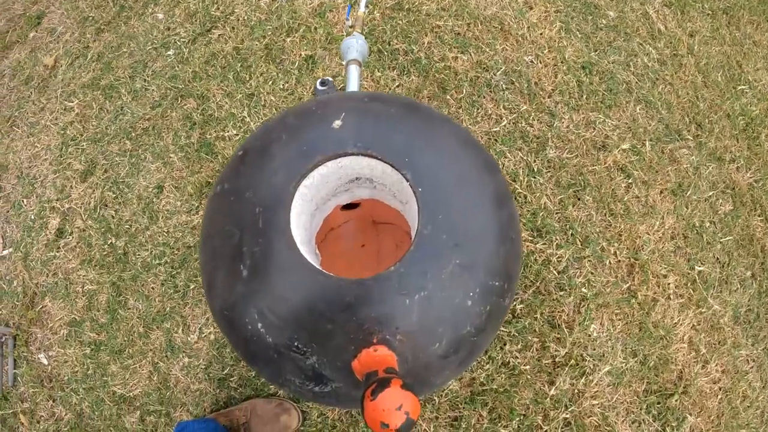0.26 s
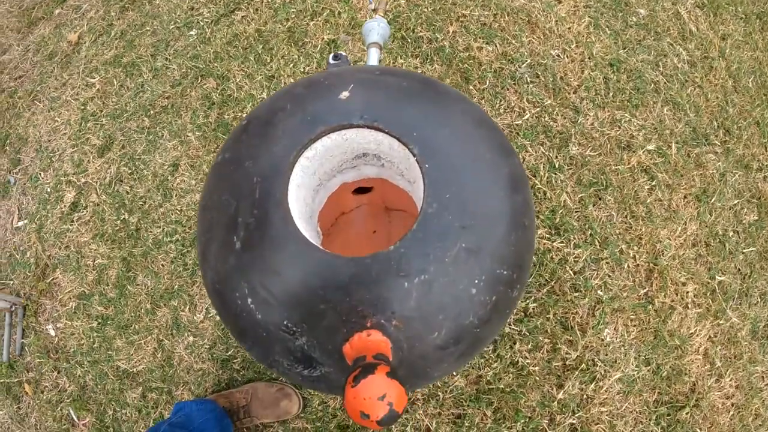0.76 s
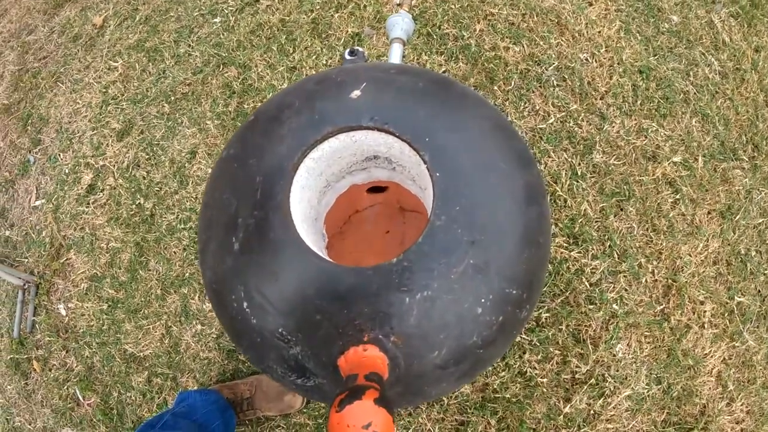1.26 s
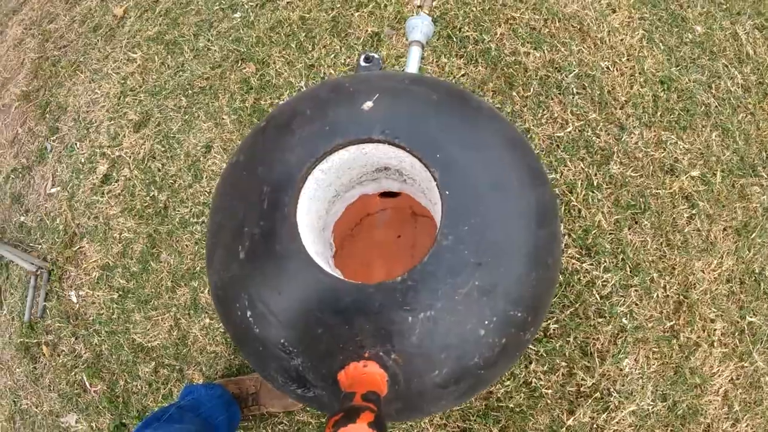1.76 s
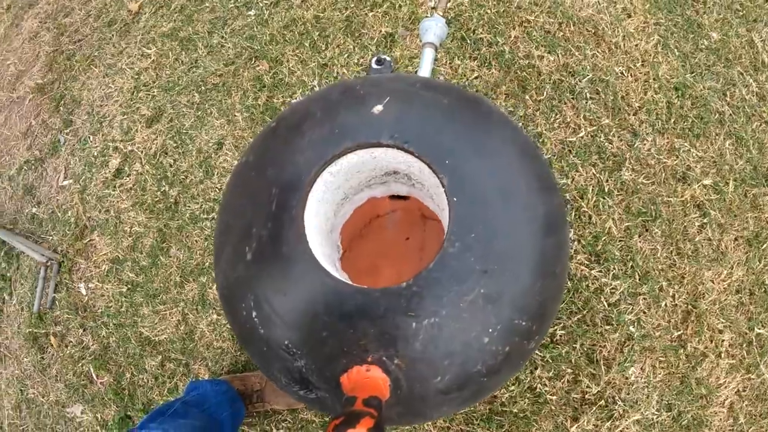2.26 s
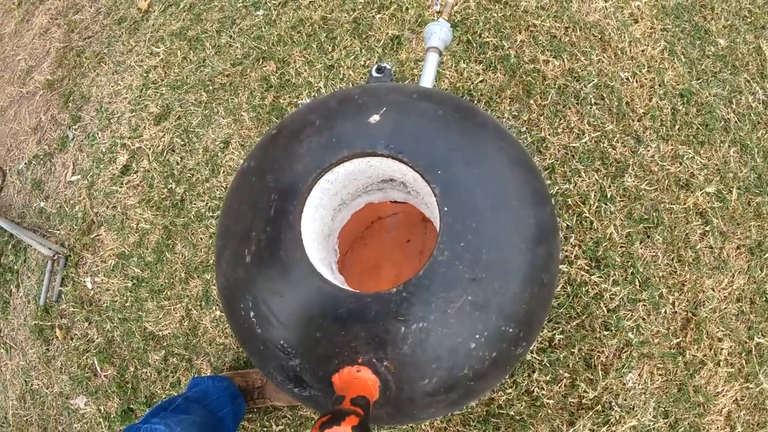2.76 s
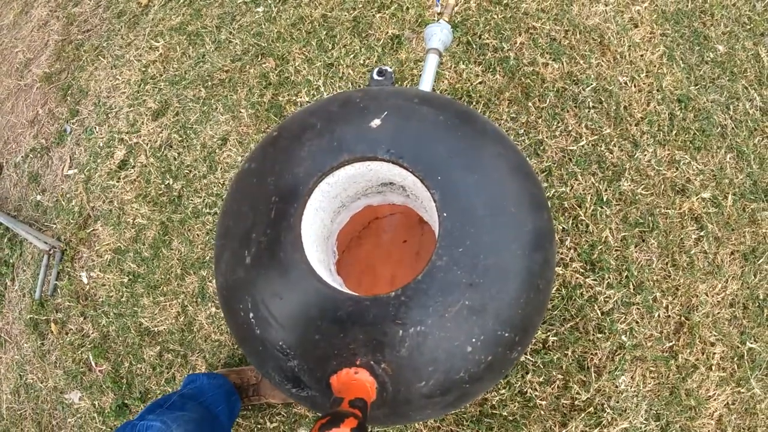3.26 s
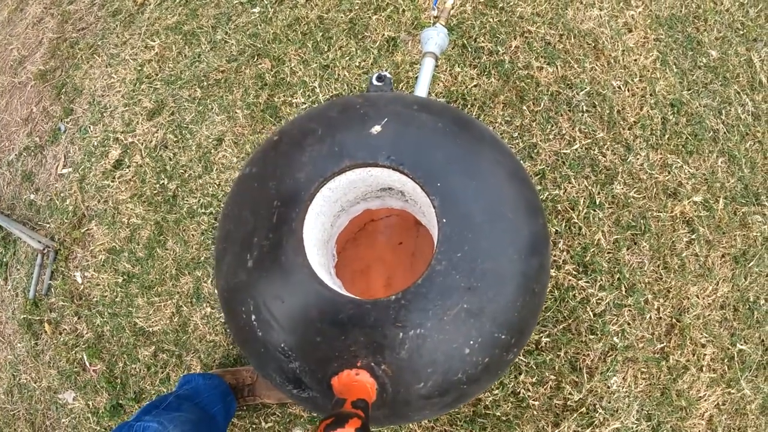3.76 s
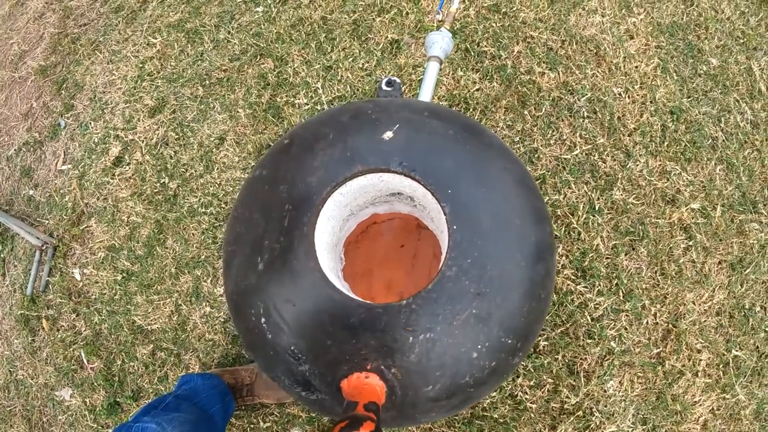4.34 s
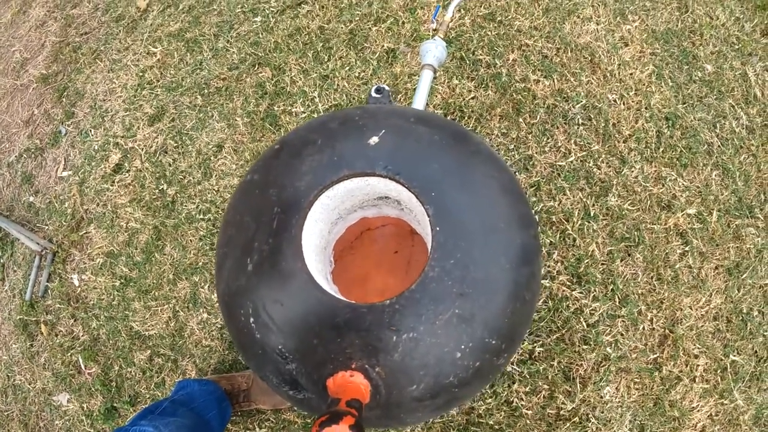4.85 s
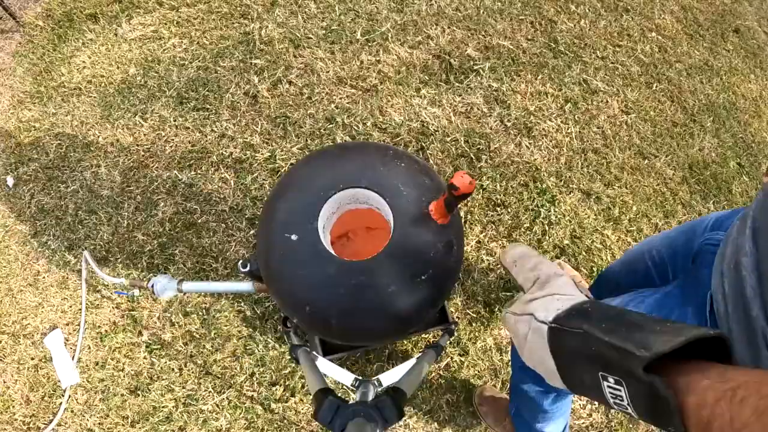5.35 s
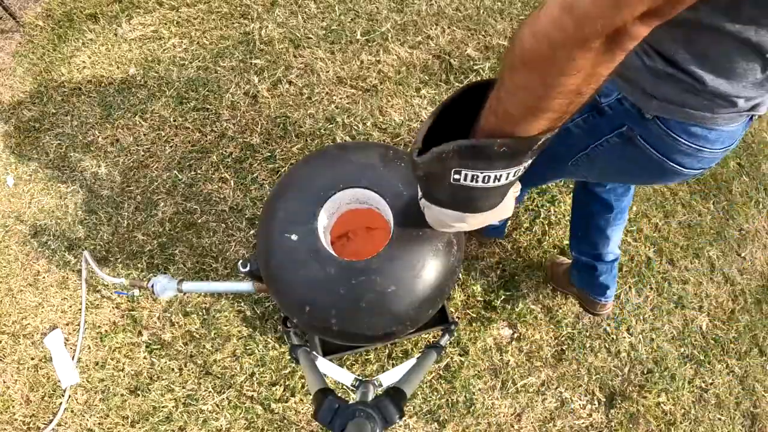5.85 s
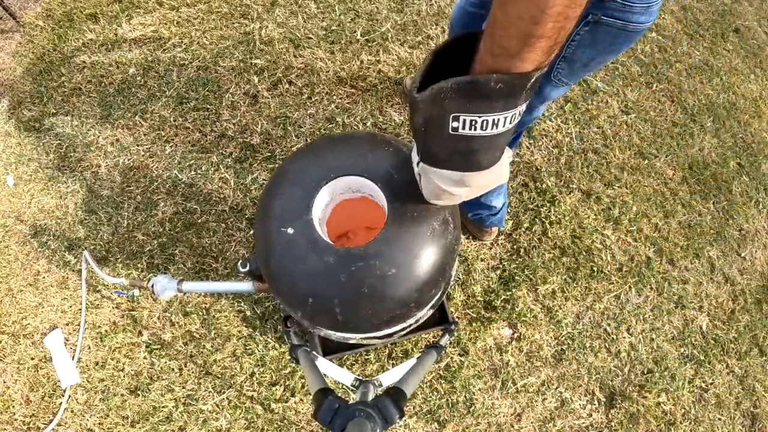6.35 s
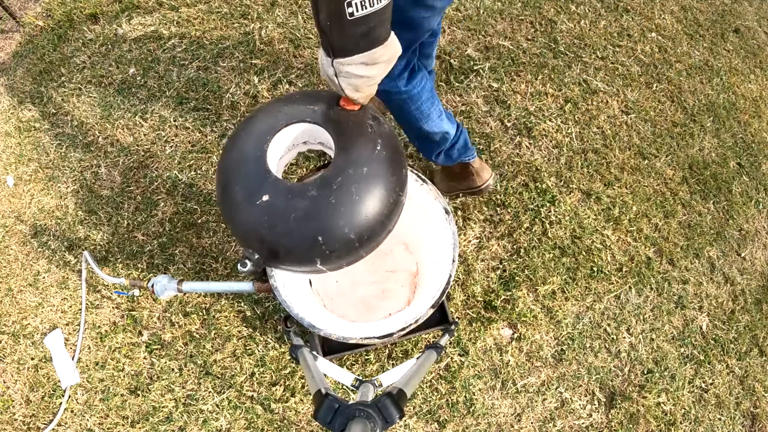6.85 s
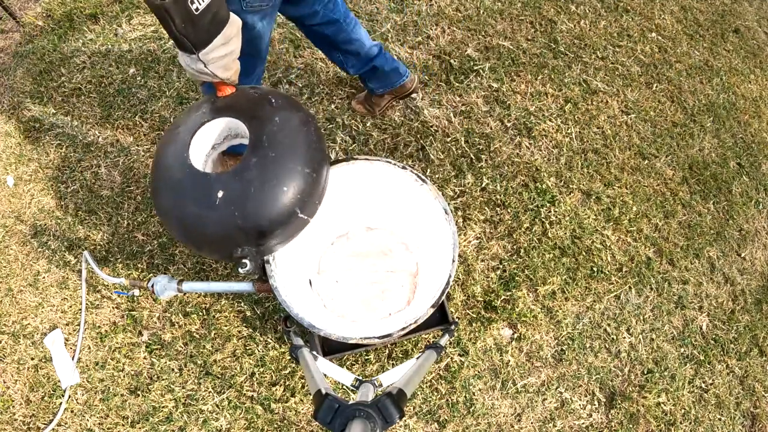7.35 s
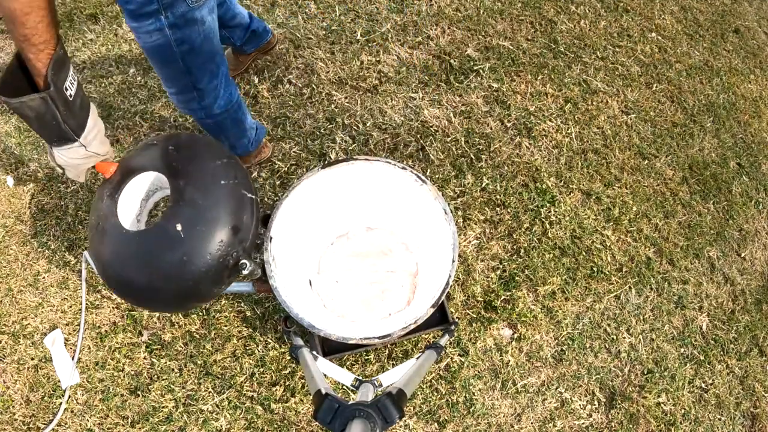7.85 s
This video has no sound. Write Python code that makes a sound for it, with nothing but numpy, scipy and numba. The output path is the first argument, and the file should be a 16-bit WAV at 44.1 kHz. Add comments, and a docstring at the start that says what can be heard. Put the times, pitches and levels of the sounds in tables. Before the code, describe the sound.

Deep, bottle-like flame boom and soft gas hiss, close and dry; near the end a steel lid knocks aside, raising the boom's pitch.

```python
"""A gas burner fires into a small foundry furnace on a lawn, heard from above the vent, then from a step aside.
The turbulent flame is filtered noise: it booms in the chamber, which sounds like a bottle, and roars above that.
The gas jet hisses through its tube, a thin whistle flutters at the supply, and air thumps on the microphone.
Late on the lid is lifted and swung aside with one steel knock, a few decaying modes:
the boom rises in pitch and the roar comes out brighter."""
import sys
import numpy as np
from scipy import signal
from scipy.fft import rfft, irfft, next_fast_len
from scipy.io import wavfile
from scipy.ndimage import uniform_filter1d, minimum_filter1d
from numba import njit

SR = 44100
rng = np.random.default_rng(int(sys.argv[2]) if len(sys.argv) > 2 else 0)


def digitize_waveform(pressure):
    """Quantize a signal to 16-bit integers and store it at the path in sys.argv[1].

    Rows of a 2-D input are taken as channels; values are limited to [-1, 1].
    """
    field = np.atleast_2d(pressure).T
    bounded = np.clip(field, -1, 1)
    quanta = np.round(bounded * 32767).astype(np.int16)
    wavfile.write(sys.argv[1], SR, quanta)


N = 356548
TIME = np.arange(N) / SR

# The thin whistle of the gas supply. Each row: time in seconds, pitch before its bend in Hz, level in dB.
WHISTLE_PATH = [(0, 9880, -81.5), (2.4, 10200, -74.5), (4.3, 10150, -73), (4.43, 10050, -70),
                (4.47, 10100, -80), (4.72, 10160, -73.5), (5.25, 10200, -72), (5.28, 9680, -74.5),
                (7.4, 9600, -80.5), (8.05, 9520, -78)]
# The lid is cracked open, lifted and swung aside. Each row: time in seconds, share of its travel (0-1).
LID_PATH = [(6.18, 0), (6.27, .07), (6.33, .04), (6.39, .16), (6.56, .14), (6.68, .38), (6.86, 0.62),
            (7.02, .76), (7.5, 1)]
# The lid's edge uncovers the gas jet in two steps. Each row: time in seconds, share uncovered (0-1).
JET_UNCOVERED = [(6.64, 0), (6.67, .4), (6.8, .4), (6.83, .88), (7.0, .97), (7.4, 1)]
# How far the furnace is off the microphone's axis. Each row: time in seconds, share (0-1).
FURNACE_OFF_AXIS = [(0, .14), (1.5, 0.67), (5.25, 0.99), (5.28, 0), (7.3, 0.05), (8.05, 0.46)]

# Spectra of the boom's burning, lid shut and lid away. Each row: frequency in Hz, relative density in dB per Hz.
BURN_LID_SHUT = [(15, -14), (40, -3), (70, 3), (130, 1.5), (200, -2.5), (255, -5.5), (300, -10.5),
                 (345, -16), (450, -37.5), (900, -58)]
BURN_LID_AWAY = [(15, -16.5), (70, 4), (130, 1), (200, -1), (270, -2.5), (330, -10), (385, -24.5),
                 (460, -38.5), (900, -59.5)]
# Spectra of the roar from above the vent, from a step aside and with the lid away.
# Each row: frequency in Hz, relative density in dB per Hz.
ROAR_FROM_ABOVE = [(250, -19), (350, -5), (430, 2), (520, -1), (650, -4.5), (800, -7), (930, -4.5),
                   (1170, -8), (1400, -16.5), (1650, -21), (1900, -27), (2400, -35), (3200, -48.5),
                   (6000, -73)]
ROAR_FROM_ASIDE = [(250, -23), (350, -1.5), (420, 0), (510, -0.5), (620, -11), (780, -10), (950, -9),
                   (1160, -9), (1380, -23), (1800, -24.5), (2300, -34), (3200, -42.5), (6000, -70.5)]
ROAR_LID_AWAY = [(280, -22), (385, -3.5), (440, 2), (540, 0), (700, -4), (920, -10.5), (1180, -10),
                 (1450, -16), (1850, -29.5), (2400, -31.5), (3200, -42), (6000, -70)]
# Spectra of the jet's hiss from above the vent, from a step aside and with the lid away.
# Each row: frequency in Hz, relative density in dB per Hz.
HISS_FROM_ABOVE = [(1200, -9.5), (2000, 1), (2400, 1), (2650, -.5), (2850, 0), (3020, -4), (3300, -1.5),
                   (3950, 1), (4450, 1.5), (5020, -3.5), (5450, -.5), (6100, -7.5), (6500, -9), (7700, -14),
                   (10000, -35)]
HISS_FROM_ASIDE = [(1200, -11), (2000, 0), (2700, -1.5), (3000, -1), (3400, 0.5), (4000, -2), (4700, -3),
                   (5600, -7), (7500, -21), (10000, -32)]
HISS_LID_AWAY = [(1500, -8), (2400, -7), (2750, -1.5), (3100, 2), (3500, .8), (4050, -3.5), (4700, -7),
                 (5400, -10), (5900, -14), (6300, -19.5), (7500, -23.5), (10000, -43.5)]
# Spectrum of the fine sizzle. Each row: frequency in Hz, relative density in dB per Hz.
SIZZLE_SPECTRUM = [(4500, -19), (6300, -1.5), (7800, -1), (8600, -5.5), (9600, 1), (10800, -17),
                   (12000, -16), (13800, -15.5), (15000, -27)]
# Spectrum of air on the microphone. Each row: frequency in Hz, relative density in dB per Hz.
BUFFET_SPECTRUM = [(8, -10), (20, -3.5), (45, -2), (80, -12), (200, -41.5), (600, -96)]

# Narrow overtones of the chamber, each filtered twice.
# Each row: Hz with the lid shut, Hz with the lid away, width of each pass in Hz, relative gain in dB.
CHAMBER_OVERTONES = [(906, 1300, 110, -1.5), (1110, 1500, 100, 7), (1570, 970, 90, -12),
                     (2023, 2800, 66, -9), (2424, 2340, 130, -13)]
# Resonances of the burner tube, filtered twice. Each row: Hz, width of each pass in Hz, relative gain in dB.
BURNER_TUBE_MODES = [(2830, 200, -4), (3150, 330, 0), (3480, 400, 1.5), (4400, 900, -6), (5400, 800, -11)]
# The lid knocks on its pivot. Each row: start in seconds, strength in dB.
LID_KNOCKS = [(6.9658, -16.3)]
# Modes of the lined steel lid. Each row: frequency in Hz, strength relative to the blow in dB, t60 in seconds.
LID_SHELL_MODES = [(620, 1.5, .02), (790, 2, .026), (1400, -2, .02), (1540, -14, .05), (1760, -13, .014),
                   (2015, -31, .15), (2046, -23, .32), (2090, -30, .18), (2930, -37, .3)]

# The flame surges or sags. Each row: middle in seconds, length in seconds, change in dB.
FLAME_SURGES = [(.36, .2, -1.6), (1.2, .14, -2), (1.58, .2, 2), (1.98, .24, 2), (4.2, .5, 1.8),
                (4.72, .2, -1), (5.15, .22, 2.5), (5.48, .22, -3.5), (5.59, .14, 2), (6.14, .2, -1.5),
                (6.31, .2, 1.5), (6.66, .13, 3.2), (6.87, .16, -4), (7.15, .3, 2.5), (7.38, .25, -1.4),
                (7.7, .16, -1.5), (7.91, .2, 1.5)]
# The top of the roar brightens or dulls. Each row: middle in seconds, length in seconds, change in dB.
ROAR_TOP_CHANGES = [(3.03, .7, 3), (4.53, .42, -7), (5.75, .3, 2), (6.4, .6, -3)]
# The hiss sinks for a while. One row: start in seconds, end in seconds, change in dB.
HISS_LULL = (3.41, 5.255, -6)
# The hiss spurts or dips. Each row: start in seconds, end in seconds, change in dB.
HISS_SPURTS = [(-.1, .22, -1.5), (.5, .6, 1.2), (1.2, 1.46, .6), (1.53, 1.64, 2.2), (1.73, 1.92, 1),
               (1.97, 2.05, -0.8), (2.28, 2.34, -3), (2.76, 3.0, 2.8), (3.1, 3.22, 3), (3.29, 3.35, 1),
               (3.59, 3.672, 7.5), (3.67, 3.86, 3), (3.86, 4.035, 2.2), (4.04, 4.16, 6.8), (4.16, 4.3, 4.5),
               (4.44, 4.56, -2), (4.69, 4.8, 5.3), (4.8, 4.99, 3), (5.08, 5.156, 6), (5.15, 5.24, 2.5),
               (5.7, 5.82, 2.3), (6.83, 6.9, 3.5), (6.91, 6.98, -2), (7.01, 7.05, 2.8), (7.19, 7.26, 1.5),
               (7.34, 7.56, 2.5), (7.6, 7.658, 3), (7.78, 7.886, 6), (7.88, 8.0, 2.5)]
# Spits of extra sizzle. Each row: middle in seconds, length in seconds, change in dB.
SIZZLE_SPITS = [(2.93, .16, 3), (3.63, .13, 5), (4.1, .2, 4.5), (5.12, .1, 2.5)]
# Gusts on the microphone. Each row: middle in seconds, length in seconds, change in dB.
MICROPHONE_GUSTS = [(2.35, .5, 5), (6.33, 0.3, 13), (6.92, .4, 9), (7.8, .36, 19), (8.05, 0.24, 17)]

# one edit: the sound cuts from above the vent to a step aside, with a faint, dry click
CUT_S, CLICK_DB, CLICK_DECAY_S = 5.2614, -33, .00005
# the listener leans in over the vent: level at first, time constant;
# the highest sounds beam upward, so the sizzle gains this many times as many dB
LEAN_DB, LEAN_S, SIZZLE_BEAMING = -1.1, 1, 3.6

# shares of the lid's travel: the rim shields roar and hiss up to the first;
# beyond it a gap of this scale lets the boom, or the roar and hiss, out
RIM_SHARE, BOOM_GAP, ROAR_GAP = .14, 0.058, 0.3
OPEN_SHARE = 0.78  # weight of the open chamber's sound, once the gap is wide

# the chamber's bottle resonance, lid shut and lid away
SHUT_HZ, OPEN_HZ, CHAMBER_WIDTH_HZ = 164.1, 252, 50.8
# each layer: base level above the vent, change a step aside, change with the lid away (dB)
BOOM_DB, BOOM_ASIDE_DB, BOOM_OPEN_DB = -15.65, -2.03, 1.3
ROAR_DB, ROAR_ASIDE_DB, ROAR_OPEN_DB = -39.5, -0.43, 10.5
HISS_DB, HISS_ASIDE_DB, HISS_OPEN_DB = -60, 0.1, 10.5
# the lid leaves the level of the fine sizzle alone
SIZZLE_DB, SIZZLE_ASIDE_DB = -72.5, 2.2
SIZZLE_FOLLOWS = .75  # dB that the sizzle gains per dB of a spurt in the hiss

ROAR_TOP_HZ = 1330  # the top of the roar begins here
SPURT_EDGE_S = .05  # time that the hiss takes to rise or fall
# once the lid is clear of the rim, the bare flame rasps
CLEAR_S, RASP_HZ, RASP_WIDTH_HZ, RASP_DB = 7.76, 1850, 700, -52.5
FLUTTER_HZ = 62.3
# a higher, fainter whistle (dB relative to the first) builds up beside it, then fades out from 6.64 to 7.4 s
UPPER_WHISTLE_HZ, UPPER_WHISTLE_DB, UPPER_RISE_S = 10360, -5, 4.3
# air on the microphone: base level and spread of its slow wander (dB)
BUFFET_DB, BUFFET_WANDER_DB = -47, 2.5
TOP_HZ = 14800  # upper limit of the microphone's sound


def undb(db):
    """Decibels to gain."""
    return 10 ** (np.asarray(db) / 20)


def unit(x):
    """Scale to an rms of one."""
    return x / np.sqrt(np.mean(x ** 2))


def curves(table):
    """The columns of a table, joined by straight lines in time."""
    seconds, *columns = np.transpose(table)
    return [np.interp(TIME, seconds, column) for column in columns]


def swells(table):
    """Smooth rises and falls in dB, one for each row of middle, length, change."""
    total = 0
    for middle, length, db in table:
        phase = np.clip((TIME - middle) / length, -.5, .5)
        total = total + db * np.cos(np.pi * phase) ** 2
    return total


def edge(start):
    """A quick rise from zero to one around a moment."""
    return np.clip((TIME - start) / SPURT_EDGE_S + .5, 0, 1)


def spurts(table):
    """Quick, held steps in dB, one for each row of start, end, change."""
    return sum(db * (edge(start) - edge(end)) for start, end, db in table)


def turbulence():
    """White noise."""
    return rng.standard_normal(N)


def walk(rate):
    """Random levels, `rate` of them per second, slewed twice; spread one."""
    hold = int(SR / rate)
    steps = np.repeat(rng.standard_normal(N // hold + 1), hold)
    slewed = uniform_filter1d(uniform_filter1d(steps, hold), hold)
    return unit(slewed[:N])


def colour(x, spectrum):
    """Filter a sound by a curve of (Hz, dB) points, to an rms of one."""
    hz, db = np.transpose(spectrum)
    size = next_fast_len(N)
    bins = np.maximum(np.arange(size // 2 + 1) * SR / size, 1)
    gain = undb(np.interp(np.log(bins), np.log(hz), db))
    return unit(irfft(rfft(x, size) * gain, size)[:N])


@njit
def band_pass(x, hz, width):
    """State-variable band-pass whose centre may move, gain one at the centre."""
    y, band, low = np.empty(len(x)), 0., 0.
    for i in range(len(x)):
        g = np.tan(np.pi * hz[i] / SR)
        k = width / hz[i]
        v = (band + g * (x[i] - low)) / (1 + g * (g + k))
        band, low, y[i] = 2 * v - band, low + 2 * g * v, k * v
    return y


def resonate(x, hz, width_hz):
    """One resonance, fixed or moving."""
    return band_pass(x, hz * np.ones(N), float(width_hz))


def steep(x, hz, width_hz):
    """A resonance applied twice, with dark skirts."""
    return resonate(resonate(x, hz, width_hz), hz, width_hz)


def aside():
    """Zero above the vent, one a step aside, with a 4 ms crossfade at the cut."""
    return np.clip((TIME - CUT_S) / .004 + .5, 0, 1)


def lean_db():
    """The sound grows a little as the listener leans in."""
    return LEAN_DB * np.exp(-TIME / LEAN_S)


def travel():
    """How far the lid has moved, 0-1."""
    return curves(LID_PATH)[0]


def laid_open(gap, shielded):
    """Share of the sound that escapes past the lid; the first gap beyond the shielding rim does most."""
    return OPEN_SHARE * np.tanh(np.maximum(travel() - shielded, 0) / gap)


def uncover(x, above_vent, past_rim, lid_away, gap, shielded=0):
    """A sound heard down the vent, past its rim, and at last mostly straight from the open chamber."""
    step, opening = aside(), laid_open(gap, shielded)
    shut = (1 - step) * colour(x, above_vent) + step * colour(x, past_rim)
    return (1 - opening) * shut + opening * colour(x, lid_away)


def boom(neck_power=.3, drift=.012):
    """Unsteady burning drives the air in the vent against the chamber; a wider opening raises the note."""
    neck = travel() ** neck_power
    hz = (SHUT_HZ + (OPEN_HZ - SHUT_HZ) * neck) * (1 + drift * walk(rate=3.3))
    db = BOOM_DB + BOOM_ASIDE_DB * aside() + BOOM_OPEN_DB * neck
    db = db + lean_db() + swells(FLAME_SURGES)
    burning = uncover(turbulence(), BURN_LID_SHUT, BURN_LID_SHUT, BURN_LID_AWAY, BOOM_GAP)
    ringing = resonate(burning, hz, CHAMBER_WIDTH_HZ)
    # the gas feed is steady, so the power evens out over a ninth of a second
    power = uniform_filter1d(ringing ** 2, size=SR // 9)
    return ringing / np.sqrt(power) * undb(db)


def roar(flicker_db=0.55, wander_db=0.3, surge_share=0.25, jet_share=0.097, overtone_db=-15.0):
    """Smaller eddies flicker and ring the chamber's higher modes, which slide and fade as the lid leaves."""
    db = ROAR_DB + ROAR_ASIDE_DB * aside() + ROAR_OPEN_DB * travel() + lean_db()
    db = db + surge_share * swells(FLAME_SURGES) + jet_share * spurts(HISS_SPURTS)
    db = db + wander_db * walk(rate=3.5)

    eddies = turbulence() * undb(flicker_db * walk(rate=45))
    broad = uncover(eddies, ROAR_FROM_ABOVE, ROAR_FROM_ASIDE, ROAR_LID_AWAY, ROAR_GAP, RIM_SHARE)

    clear = np.clip((travel() - RIM_SHARE) / (1 - RIM_SHARE), 0, 1)
    modes = np.zeros(N)
    for shut_hz, open_hz, width, mode_db in CHAMBER_OVERTONES:
        hz = shut_hz + (open_hz - shut_hz) * clear
        modes += undb(mode_db) * steep(turbulence(), hz, width)
    fading = undb(overtone_db) * (1 - travel() ** 2)
    flame = (broad + fading * unit(modes)) * undb(db)

    high_pass = signal.butter(6, ROAR_TOP_HZ, "high", fs=SR, output="sos")
    top = signal.sosfiltfilt(high_pass, flame)
    return flame + top * (undb(swells(ROAR_TOP_CHANGES)) - 1)


def jet(waver_db=0.5, sputter_db=1., sizzle_waver_db=0.8, steadying=0.43, tube_db=-8, tube_aside_db=4):
    """Gas rushes through the burner tube and rings it; its hiss spurts, sputters and carries a fine sizzle."""
    spurt_db = spurts([HISS_LULL] + HISS_SPURTS)
    waver = walk(rate=29) * (1 - steadying * aside())  # steadier away from the hot plume over the vent
    uncovered = curves(JET_UNCOVERED)[0]

    tube = np.zeros(N)
    for hz, width, mode_db in BURNER_TUBE_MODES:
        tube += undb(mode_db) * steep(turbulence(), hz, width)
    rush = uncover(turbulence(), HISS_FROM_ABOVE, HISS_FROM_ASIDE, HISS_LID_AWAY, ROAR_GAP, RIM_SHARE)
    tube_gain = undb(tube_db + tube_aside_db * aside())
    hiss_db = HISS_DB + HISS_ASIDE_DB * aside() + HISS_OPEN_DB * uncovered + lean_db() + spurt_db
    hiss = unit(rush + tube_gain * unit(tube)) * undb(hiss_db)

    sizzle_db = SIZZLE_DB + SIZZLE_ASIDE_DB * aside() + SIZZLE_BEAMING * lean_db()
    sizzle_db = sizzle_db + swells(SIZZLE_SPITS) + SIZZLE_FOLLOWS * spurt_db + sizzle_waver_db * waver
    sizzle = colour(turbulence(), SIZZLE_SPECTRUM) * undb(sizzle_db)

    rasp = unit(steep(turbulence(), RASP_HZ, RASP_WIDTH_HZ)) * undb(RASP_DB) * edge(CLEAR_S)
    return (hiss + sizzle + rasp) * undb(waver_db * waver + sputter_db * walk(rate=140))


def supply(depth=0.8, stray_hz=.6, bend_hz=260, jitter_hz=100):
    """The gas regulator flutters, so two thin whistles come in quick puffs, each arching up in pitch."""
    hz, db = curves(WHISTLE_PATH)
    flutter_hz = FLUTTER_HZ + stray_hz * walk(rate=4)
    pressure = np.sin(2 * np.pi * np.cumsum(flutter_hz) / SR)

    def puffs(centre_hz):
        """One whistle, bent in pitch and swelled by the pressure."""
        pitch = centre_hz + bend_hz * (pressure - .5) + jitter_hz * walk(rate=1500)
        tone = np.sin(2 * np.pi * np.cumsum(pitch) / SR)
        return unit(tone * (1 + depth * np.tanh(2.2 * pressure)))

    build_up = np.clip(TIME / UPPER_RISE_S, 0, 1) ** 2
    fade_out = 1 - curves(JET_UNCOVERED)[0]  # shares the timing of that table
    upper = undb(UPPER_WHISTLE_DB) * build_up * fade_out
    return (puffs(hz) + upper * puffs(UPPER_WHISTLE_HZ)) * undb(db)


def buffet():
    """Moving air thumps softly on the microphone, harder in a few gusts."""
    db = BUFFET_DB + BUFFET_WANDER_DB * walk(rate=2.7) + swells(MICROPHONE_GUSTS)
    return colour(turbulence(), BUFFET_SPECTRUM) * undb(db)


def edit_click():
    """One faint, dry click at the edit, where the sound cuts from above the vent to a place aside."""
    age = TIME - CUT_S
    return undb(CLICK_DB) * (age >= 0) * np.exp(-np.abs(age) / CLICK_DECAY_S)


def lid():
    """A blow sets off decaying modes: a dull clack of the lining, with a short ring of the steel shell."""
    out = np.zeros(N)
    for start, blow_db in LID_KNOCKS:
        age = np.maximum(TIME - start, 0)
        for hz, db, t60 in LID_SHELL_MODES:
            # lightly damped modes of the shell take longer to pick up the blow than the lining does
            onset = (1 - np.exp(-age / max(t60 / 100, .0006))) ** 2
            decay = np.exp(-np.log(1000) * age / t60)
            out += undb(blow_db + db) * onset * np.sin(2 * np.pi * hz * age) * decay
    return out


def ports(x, lag_s=3.4e-5, shade_hz=2600, imbalance=.01):
    """Two close microphone ports: off the axis, the right hears a little earlier and louder; stray sound differs."""
    off_axis = curves(FURNACE_OFF_AXIS)[0]
    # a tiny lead or lag adds or takes away the slope of the wave
    low_pass = signal.butter(1, shade_hz, fs=SR, output="sos")
    slope = signal.sosfiltfilt(low_pass, np.gradient(x) * SR)
    # fresh draws of the sources, opposite in the two ports
    stray = undb(-21.5) * roar() + undb(-5.5) * jet() + undb(-7.5) * supply() + undb(-11.5) * buffet()
    side = off_axis * (stray - lag_s / 2 * slope - imbalance * x)
    return np.array([x + side, x - side])


def scene():
    """All sources in the open air, without echo."""
    return ports(boom() + roar() + jet() + supply() + buffet() + edit_click() + lid())


def record(dry, ceiling=.53):
    """A quick limiter holds the largest surges of the boom; the top is cut."""
    headroom = np.minimum(1, ceiling / (np.abs(dry).max(axis=0) + 1e-9))
    gain = uniform_filter1d(minimum_filter1d(headroom, size=700), size=700)
    top_cut = signal.ellip(8, .2, 70, TOP_HZ, fs=SR, output="sos")
    return signal.sosfilt(top_cut, dry * gain)


dry = scene()
out = record(dry)
digitize_waveform(out)
```